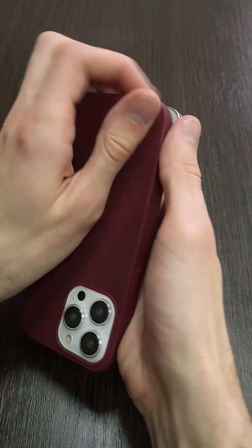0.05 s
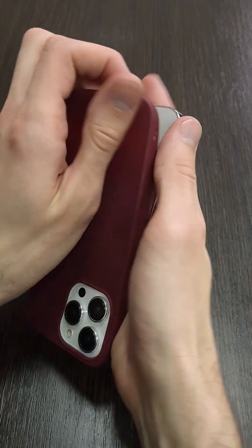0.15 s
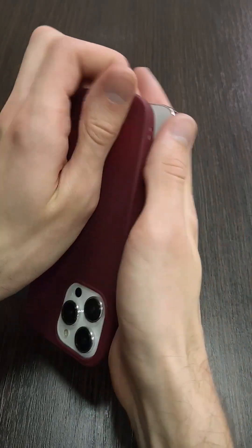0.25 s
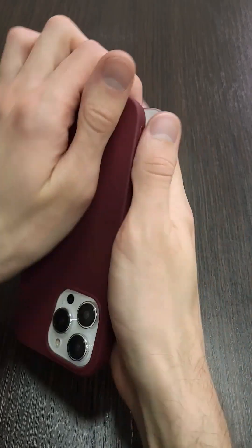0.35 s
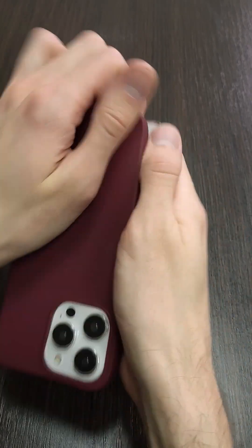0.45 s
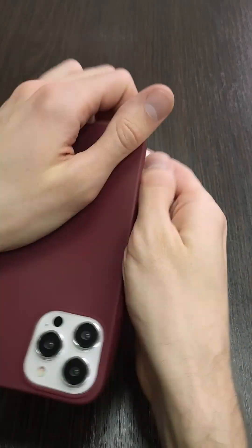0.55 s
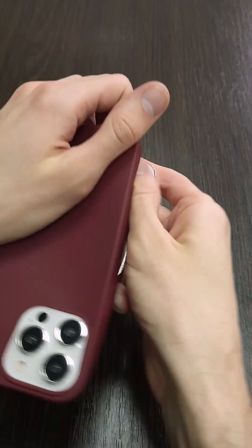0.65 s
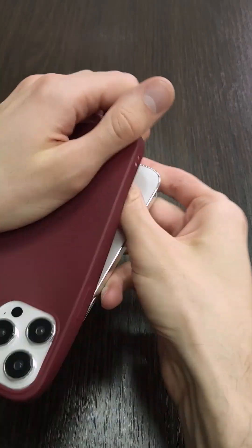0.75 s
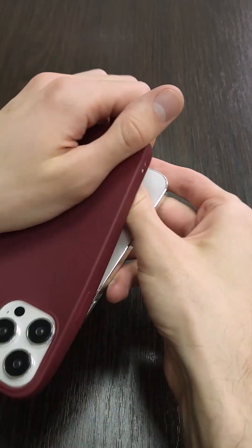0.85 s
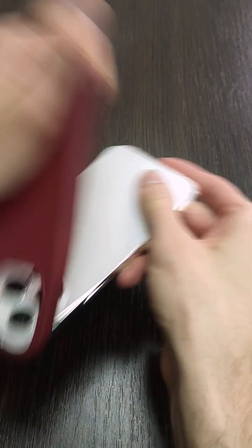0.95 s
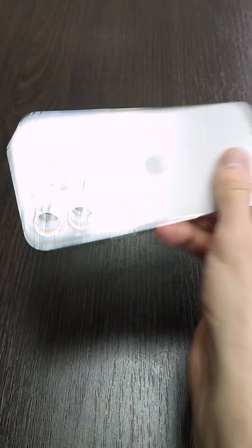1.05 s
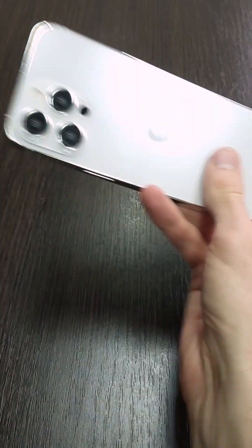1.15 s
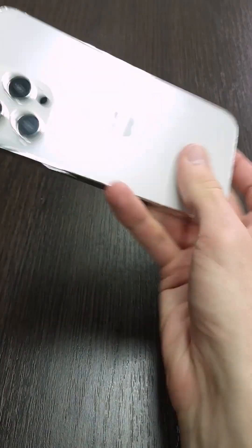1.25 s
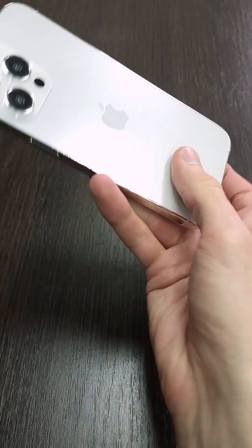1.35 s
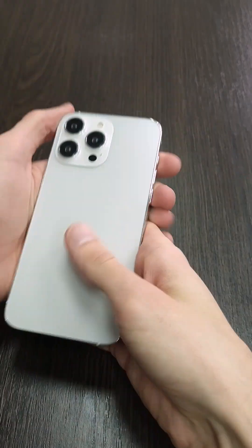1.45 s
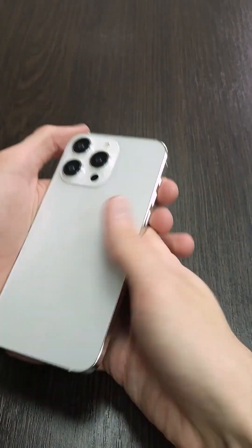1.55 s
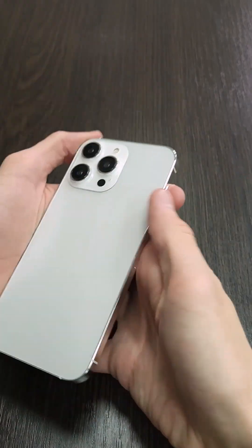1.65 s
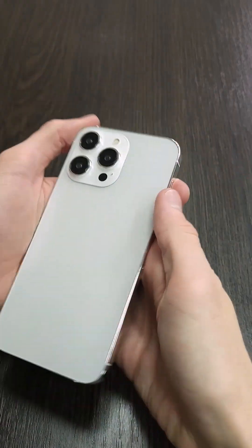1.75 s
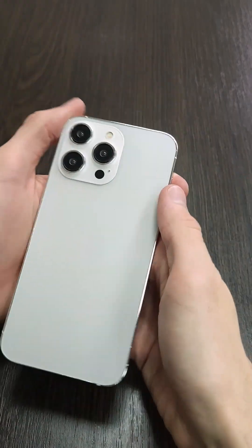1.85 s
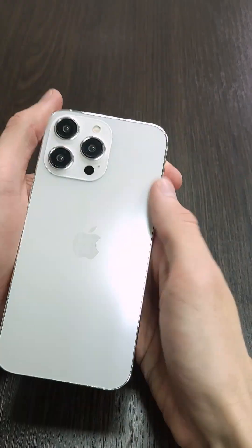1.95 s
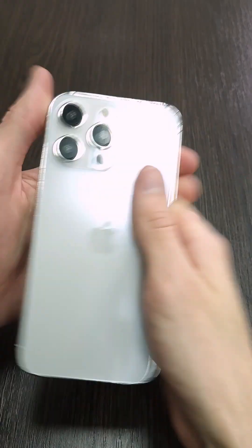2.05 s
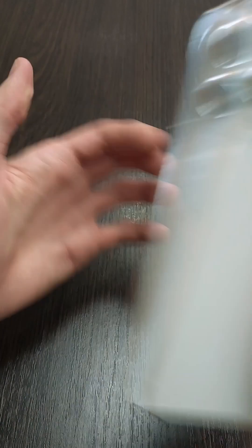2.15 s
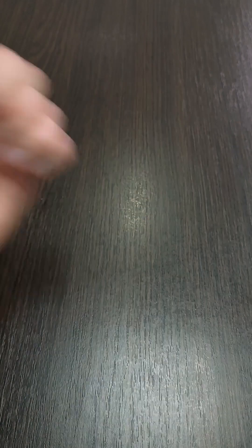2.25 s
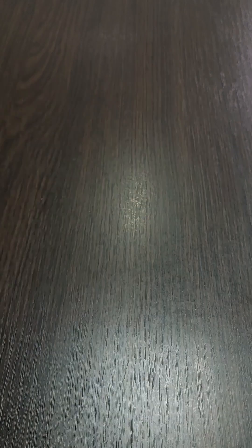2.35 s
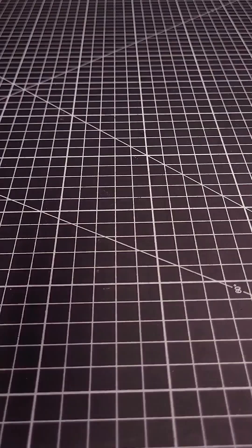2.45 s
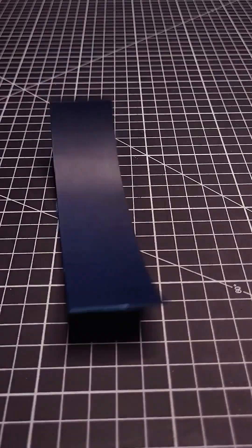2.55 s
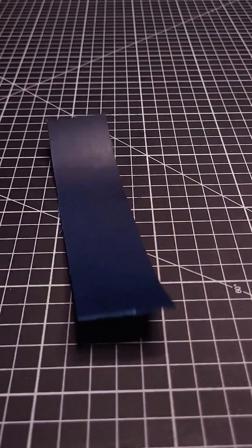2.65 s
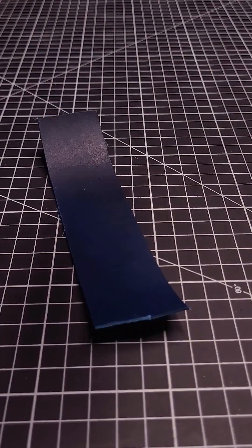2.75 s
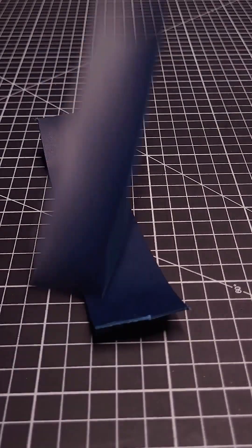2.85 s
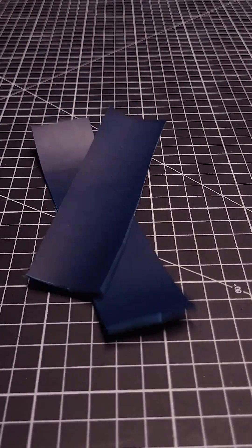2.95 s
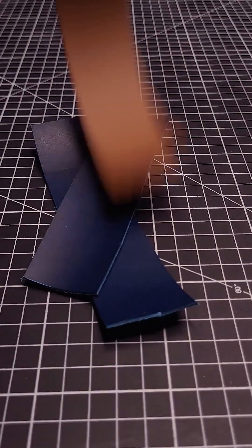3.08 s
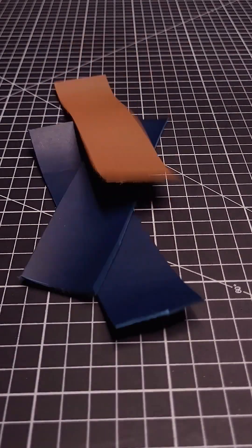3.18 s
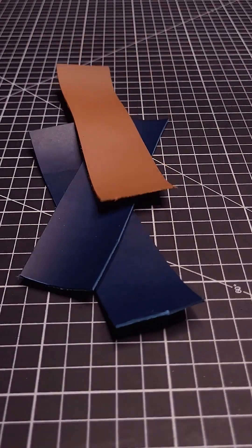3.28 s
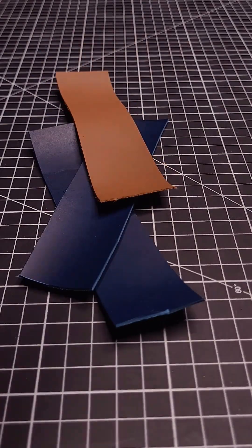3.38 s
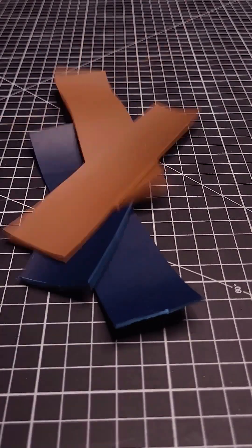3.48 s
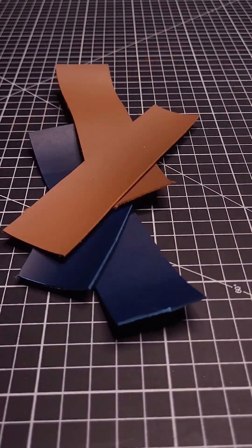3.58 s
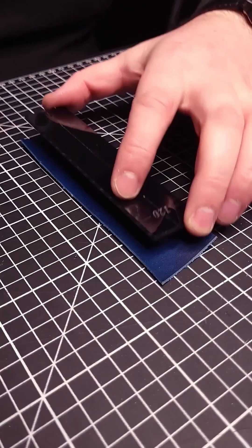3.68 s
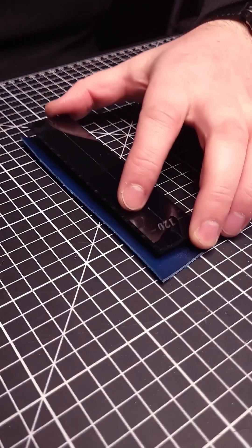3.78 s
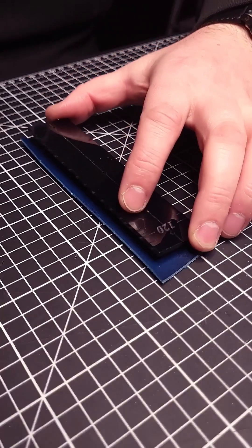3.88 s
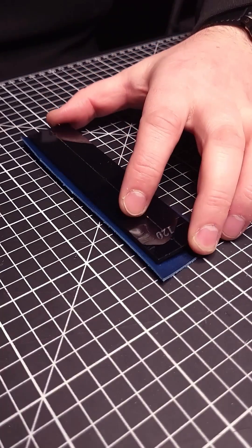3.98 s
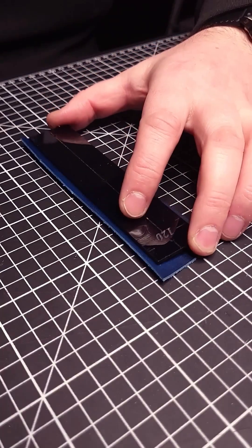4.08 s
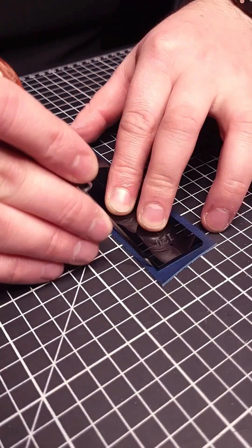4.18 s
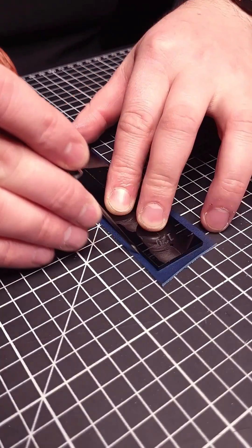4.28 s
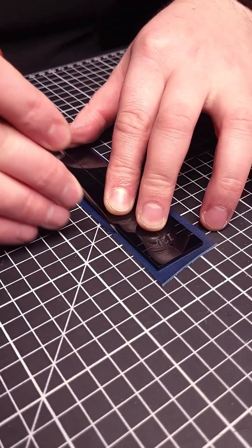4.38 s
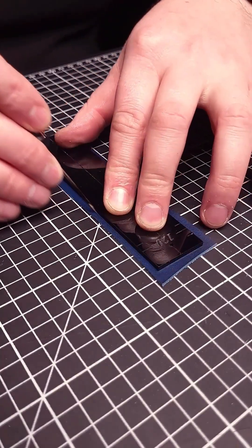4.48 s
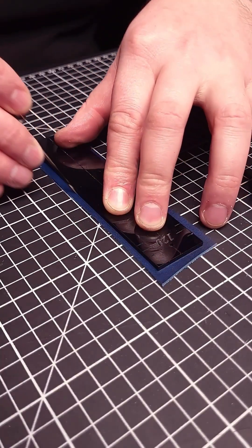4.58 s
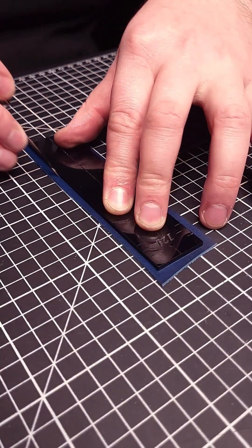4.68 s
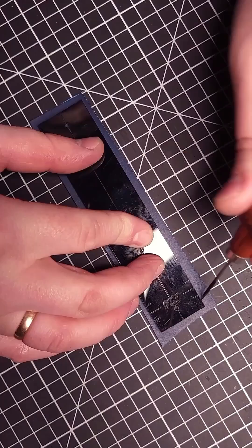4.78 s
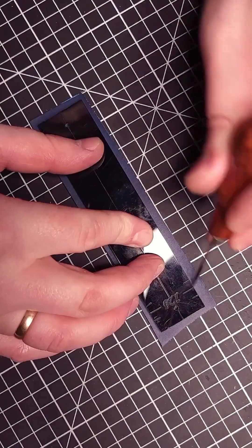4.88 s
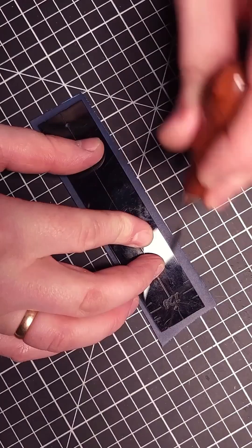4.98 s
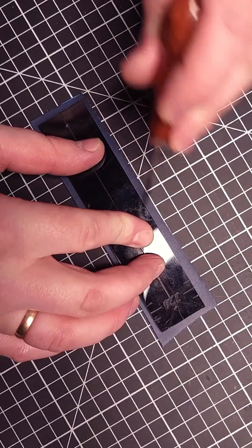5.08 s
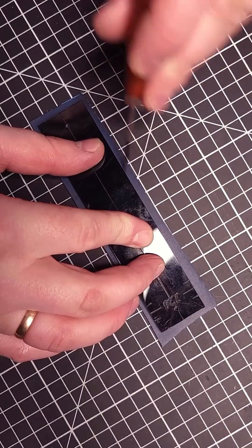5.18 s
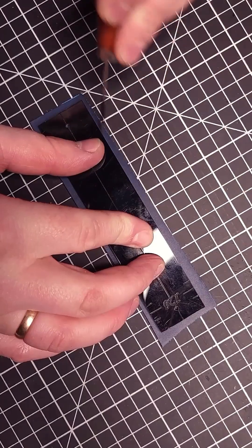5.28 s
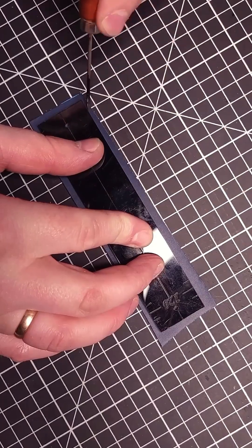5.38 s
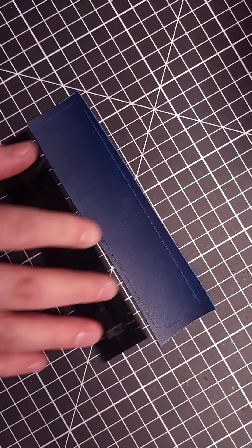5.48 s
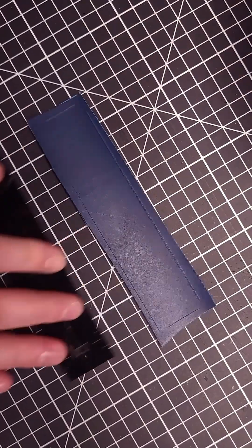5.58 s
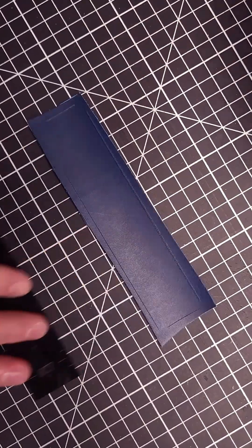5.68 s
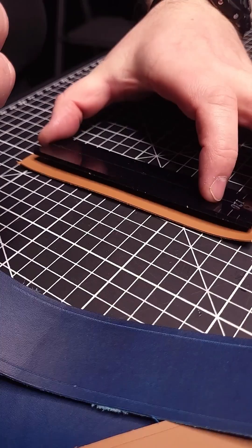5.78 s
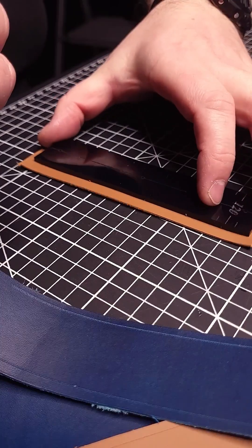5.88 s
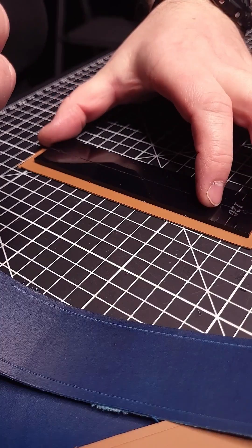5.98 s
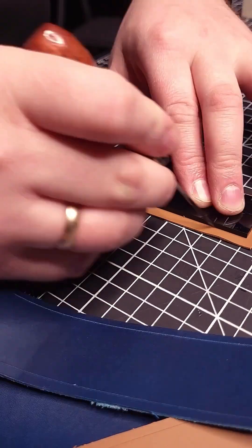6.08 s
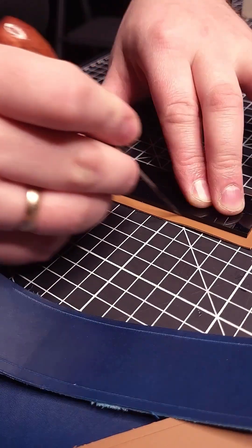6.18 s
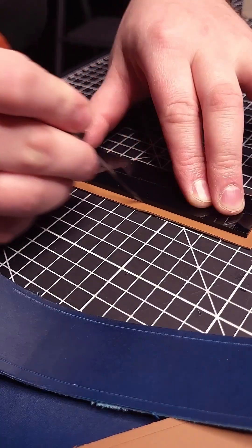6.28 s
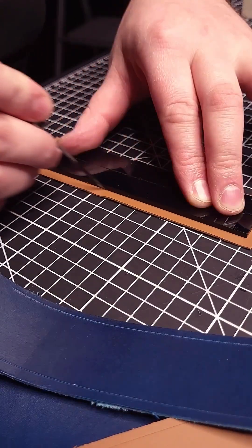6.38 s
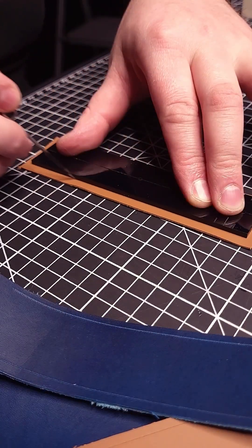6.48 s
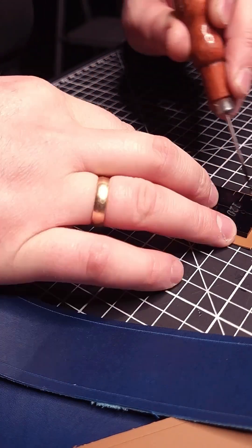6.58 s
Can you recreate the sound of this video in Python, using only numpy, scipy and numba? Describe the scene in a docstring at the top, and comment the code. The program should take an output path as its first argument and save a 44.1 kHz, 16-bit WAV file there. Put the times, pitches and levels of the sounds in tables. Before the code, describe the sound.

Close stereo handling at a desk: skin rubs a soft case, sharp snaps pop it off, and a phone lands dully in a palm over low rumble. An abrupt change to a quiet workshop with a faint motor hum: four leather strips slap onto a mat, an awl makes two gritty tearing strokes, a template slides off with knocks, and the awl scrapes again.

```python
"""At a desk, in wide stereo from two microphone ports, hands rub and snap a phone out of its soft case; it lands
in the palm and settles. From 2.4 s, heard from one point in a workshop, four leather strips slap onto a cutting
mat, a steel awl tears along the grain beside a template, the template slides off and the awl strokes again.
Rubs, friction and air are coloured noise, contacts are dying bursts, tears are uneven clicks, hard parts ring.
The level dips briefly at each join between shots."""
import sys
import numpy as np
from scipy import signal
from scipy.fft import rfft, irfft, next_fast_len
from scipy.io import wavfile
from numba import njit

SR = 44100
rng = np.random.default_rng(int(sys.argv[2]) if len(sys.argv) > 2 else 0)


def log_audio(samples):
    """Write samples as a 16-bit WAV file to the path given in sys.argv[1]."""
    # one column per channel
    frames = np.atleast_2d(samples).T
    # limit to full scale, then quantise
    limited = np.clip(frames, -1, 1)
    pcm = np.round(limited * 32767).astype(np.int16)
    wavfile.write(sys.argv[1], SR, pcm)


N = 292824
TIME = np.arange(N) / SR
SIZE = next_fast_len(N + SR)
HZ = np.maximum(np.arange(SIZE // 2 + 1) * SR / SIZE, 1)   # frequency grid

# Gesture columns, used by all movement tables below:
# [start t/s, end t/s, level/dB, rise t/s, fall t/s, change start to end/dB, arch/dB]

# awl strokes, with a dull rustle as the point lifts after the second; level before the gliding colour [gesture]
STROKES = [(4.144, 4.79, -30, 0.044, 0.0037, 0, 1.5), (4.793, 5.361, -32, .035, 0.054, 6.5, 5.5),
           (5.316, 5.395, -37.5, 0.0011, .003, -7, -2), (6.054, 6.541, -28.5, 0.016, 0.023, -4.5, 4.5),
           (6.542, 6.656, -35, 0.0061, .002, 3, 6)]
# colour of each stroke: lists of [f/Hz, level/dB]
STROKE_COLOURS = [
    [(59, -44), (100, -12.5), (166, -16.5), (210, 1), (328, 7), (481, 14), (535, 6), (1030, 6.5), (1420, 4),
     (2000, -0.5), (2370, 0.5), (4380, -6.5), (7140, -11.5), (9820, -6), (16000, -19.5)],
    [(59, -76), (100, -25), (215, -6.5), (452, 4.5), (502, 0), (836, 2), (1280, -1.5), (1550, 4),
     (1830, -1.5), (2080, -5.5), (3250, -5), (5080, -4), (7940, -10), (9210, -7), (16000, -22)],
    [(88, -26), (150, -8), (1700, -1), (2600, -24), (9270, -21), (15000, -34)],
    [(59, -25), (100, -19), (260, -4), (343, 0.5), (502, -7.5), (1030, 3.5), (1280, -4), (1580, -6),
     (1830, -6.5), (2130, -2.5), (3540, -6.5), (6990, -21.5), (10700, -8.5), (16000, -31)],
    [(59, -53), (100, -15.5), (801, 1), (1250, -9.5), (1870, -6), (2630, -7), (4670, -6), (7610, -28),
     (10000, -7.5), (16000, -23.5)],
]
# single fibre tears at set times, most of them strong [t/s, level re the rms of the chance tears/dB]
TEARS = [(4.181, 27.5), (4.1985, 26), (4.221, 18), (4.255, 30.5), (4.3138, 27.5), (4.473, 26.5),
         (4.5556, 28), (4.9635, 25.5), (5.0589, 12), (6.0694, 23.5), (6.176, 4), (6.2256, 27), (6.3413, 26),
         (6.5454, 37)]
WANDER_SHARE, WANDER_DB, WANDER_PER_S = .022, 2.0, 7   # the hand is never quite steady
SURGE_DB, SURGE_PER_S = -0.6, 14   # uneven pull


def awl():
    """The point tears fibre after fibre: uneven clicks, mostly pushes, on friction noise, in a gliding colour."""
    out = np.zeros(N)
    for row, spectrum in zip(STROKES, STROKE_COLOURS):
        out += gesture(*row) * rms_one(colour(grain(), spectrum))
    out = out * amp(SURGE_DB * drift(SURGE_PER_S))
    return hand_colour(out)


def grain():
    """Fibres give way at uneven times and strengths; steady friction hisses beneath."""
    strengths = amp(4.0 * np.minimum(rng.exponential(1, N), 4.0))
    signs = np.where(rng.random(N) < .72, 1, -1)
    tears_per_s = 2500 * amp(2.5 * drift(60))
    tears = rms_one(strengths * signs * (rng.random(N) < tears_per_s / SR))
    for s, db in TEARS:
        tears[round(s * SR)] += amp(db)
    friction = 0.51 * rng.standard_normal(N)
    return tears + friction


# the colour glides as the hand moves along the template; start, middle and end of each stroke, before the wander:
# [low ring f/Hz, level/dB, hollow f/Hz, level/dB, high ring f/Hz, level/dB, first echo off the fingers t/ms]
GLIDES = [
    [(2770, 0.5, 7100, -0.5, 10000, 11, 0.472), (4750, 8, 7600, -6.5, 10300, 13.5, 0.454),
     (3570, 13, 9000, 3.5, 11200, -3, 0.383)],
    [(4340, -1, 6200, -8, 9400, 10, 0.467), (4804, -0.5, 7400, -4.5, 9900, 5, 0.39),
     (4200, -1.5, 7460, -9, 14000, -5, 0.381)],
    [(4200, -6, 7300, -5, 11800, -8, 0.357)] * 3,
    [(2560, 1, 2900, -3, 9500, 1.5, 0.606), (3130, 6, 7300, -1.5, 11600, 0, 0.517),
     (2740, 2.5, 8100, -10, 12400, -6, 0.513)],
    [(4660, 3.5, 9000, 1.5, 9900, 5, 0.606), (4600, 3.5, 7300, -1, 10500, 1.5, .52),
     (4500, -4, 6840, 5, 10500, -2, .45)],
]


def glides():
    """The moving hand's resonances and echo, joined by straight lines in time."""
    times = np.sort([np.linspace(start, end, 3) for start, end, *_ in STROKES], axis=None)
    return in_time(np.column_stack([times, np.vstack(GLIDES)]))


def hand_colour(x):
    """Three short echoes off the fingers, then a low ring, a hollow and a high ring, all gliding."""
    low_hz, low_db, hollow_hz, hollow_db, high_hz, high_db, echo_ms = glides()
    low_db, hollow_db, high_db = (db + WANDER_DB * drift(WANDER_PER_S) for db in (low_db, hollow_db, high_db))
    echo_ms = echo_ms * (1 + WANDER_SHARE * drift(WANDER_PER_S))
    for longer, share in ((1, .3), (2.3, .26), (3.4, .24)):   # each echo also repeats those before it
        echo = np.interp(TIME - longer * echo_ms / 1000, TIME, x)
        x = x + share * echo
    x = gliding_bell(x, low_hz, amp(low_db), 3.7, SR)
    x = gliding_bell(x, hollow_hz, amp(hollow_db), 1.6, SR)
    return gliding_bell(x, high_hz, amp(high_db), 4.4, SR)


@njit
def gliding_bell(x, hz, gain, sharpness, rate):
    """A peak (gain over 1) or a hollow whose centre and gain change sample by sample."""
    y = np.zeros_like(x)
    for i in range(2, len(x)):
        w, root = 2 * np.pi * hz[i] / rate, np.sqrt(gain[i])
        a, c = np.sin(w) / (2 * sharpness), -2 * np.cos(w)
        fed = (1 + a * root) * x[i] + c * x[i - 1] + (1 - a * root) * x[i - 2]
        y[i] = (fed - c * y[i - 1] - (1 - a / root) * y[i - 2]) / (1 + a / root)
    return y


# parts of a strip meet the mat one after another [t/s, level before the band offsets/dB, crack re level/dB]
SLAPS = [(2.4805, -19, 7), (2.4857, 0, 10.5), (2.4919, 1, -2), (2.4953, -3, 9), (2.5103, -7.5, 3),
         (2.8242, -31.5, 2), (2.8293, -7, 5), (2.843, -12.5, 18), (2.8506, -7.5, -23.5),
         (2.8565, -18, -3.5), (3.081, -24, 18.5), (3.084, -7, -10.5), (3.0866, -10, 14),
         (3.0886, -1.5, 9.5), (3.093, -24, 4.5), (3.1429, -24, -11.5), (3.1468, -20.5, 4),
         (3.4262, -13.5, 1), (3.4293, -5, -2.5), (3.4303, -16.5, -5.5), (3.4325, -9.5, -5),
         (3.436, -13, -7.5), (3.438, -16.5, -3), (3.4413, -21, -3), (3.442, -15.5, -5.5)]
# thud of each strip, for a crack of 0 dB [thud re level/dB]
THUD_DB = [-13.5, -8.5, -9, -6]
THUD_PER_CRACK = -.3   # dB per dB: the duller the contact, the more it thuds
REBOUND_DB, REBOUND_MS = -12, 5.5   # scaled by chance: 0.5 to 1.5 times the dB, within the ms


def strips():
    """Each part of a strip that meets the mat rebounds and meets it again, weaker; rows for the blows."""
    s, db, crack_db = np.transpose(SLAPS)
    strip = np.cumsum(np.diff(s, prepend=s[0]) > .1)   # a long pause starts the next strip
    thud_db = np.take(THUD_DB, strip) + THUD_PER_CRACK * crack_db
    rows = np.transpose([s, db, thud_db, crack_db])
    later, spread = rng.random((len(rows), 2)).T
    delay = np.outer(later, [REBOUND_MS / 1000, 0, 0, 0])
    loss = np.outer(.5 + spread, [0, REBOUND_DB, 0, 0])
    return [*rows, *(rows + delay + loss)]


# small ticks and knocks of fingers, awl and template
# [t/s, level before the band offsets/dB, thud re level/dB, crack re level/dB]
TICKS = [(3.574, -48, 17, -15), (3.604, -52, 12, -15), (3.9997, -43.5, -11, 9.5), (4.8007, -21, -9, 5),
         (5.424, -19, -8.5, -7), (5.476, -16.5, -7, -1), (5.826, -51, 6, 8), (5.887, -55, 7, 2),
         (5.925, -52, 2, 0)]


def slaps_and_ticks():
    """Leather, fingers and tools strike as short three-band blows."""
    return blows(strips() + TICKS, burst_ms=1.0, thud_ms=4.8, near_db=5.0, dull_db=9.0)


# the two heavier strips thump the table top [t/s, level/dB]
THUMPS = [(3.086, -25), (3.428, -17)]
# low modes of the table top [f/Hz, level/dB, t60/s]
TABLE = [(151, -3, .04), (228, -2, .04)]


def thumps():
    """One click per heavy strip sets the low modes of the table top ringing."""
    clicks = np.zeros(N)
    for s, db in THUMPS:
        clicks[round(s * SR)] = amp(db)
    return modes(clicks, TABLE)


# template nudged, then slid off the leather [gesture]
SLIDE = [(5.397, 5.423, -44, .002, 0.0016, -1, 0.16), (5.421, 5.734, -28.5, 0.0092, 0.0063, 0.69, 0.72)]
# colour of the slide [f/Hz, level/dB]
SLIDE_COLOUR = [(59, -46), (100, -50), (181, -22.5), (244, -11), (492, -8), (608, -1.5), (1030, 1),
                (1250, -2.5), (1870, 5.5), (3190, 4.5), (5190, -10.5), (11200, -10.5), (16000, -27)]


def slide():
    """The flat template rubs smoothly over the leather: noise with a quick flutter in level."""
    rub = rms_one(colour(rng.standard_normal(N), SLIDE_COLOUR))
    return sum(gesture(*row) for row in SLIDE) * amp(1.33 * drift(96)) * rub


# mat and template hum along with whatever scrapes them [f/Hz, ring level re a unit click/dB, t60/s]
MAT = [(410, -50, .05), (555, -48, .06), (835, -48, .05), (1030, -49, .05), (1350, -50, .05),
       (1560, -50, .05), (1700, -49, .05), (1920, -47, .05), (2115, -49, .04)]


def scrapes():
    """Awl and template drive the weak modes of mat and template."""
    scrape = awl() + slide()
    return scrape + modes(scrape, MAT)


# case snaps and finger ticks
# [t/s, level before the band offsets/dB, thud re level/dB, crack re level/dB, left-right/dB]
SNAPS = [(0.0238, -16, -17, -1, -4), (0.1805, -18, -12, -26, 9), (0.3308, -42, -4, -6, -4),
         (0.4262, -43, -6, -8, 2), (0.5305, -41, -5, -4, -2), (0.8183, -10, -15, -1, -5),
         (1.1207, -32, -9, -5, 3), (1.2163, -37, -10, 0, -3), (1.3526, -37, -11, 2, 2),
         (1.3998, -6, -14, -5, -9), (2.1368, -40, -6, 1, -2)]


def snaps():
    """Case and fingers strike as short blows, stronger at one port or the other."""
    rows = np.array(SNAPS)
    ports = []
    for side in (.5, -.5):
        port_rows = rows + np.outer(rows[:, 4], [0, side, 0, 0, 0])
        ports.append(blows(port_rows, burst_ms=1.0, thud_ms=4.8, near_db=2.0, dull_db=37.0))
    ports[0] = np.roll(ports[0], 6)   # the left port is a little farther away
    return np.array(ports)


# the one snap that scuffs the hollow case into ringing [t/s, level of the scuff/dB, dying time/s]
KNOCK = (.1808, -62.5, 0.043)
# modes of the case [f/Hz, level/dB, t60/s]
CASE = [(700, -9, .09), (1050, -9, .06), (1250, -3, .08), (1410, -1, .08), (1620, -5, .05)]


def case_ring():
    """A dying noise scuff sets the modes of the hollow case ringing."""
    start, db, dying_s = KNOCK
    scuff = amp(db) * (TIME > start) * np.exp(-np.abs(TIME - start) / dying_s) * rng.standard_normal(N)
    return sum(amp(mode_db) * ring(scuff, hz, t60) for hz, mode_db, t60 in CASE)


# phone lands in the palm, a short dull scuffle [gesture]
PALM = (1.3985, 1.4255, -19, .002, .003, -3, 2)
# colour of the scuffle [f/Hz, level/dB]
PALM_COLOUR = [(29, -27), (50, 5), (222, 2), (784, -6), (1300, -11.5), (2050, -13), (2300, -19),
               (2520, -17.5), (12000, -48), (15600, -72), (22000, -120)]
# the phone settles in the hand with a soft hollow thump [gesture]
SETTLE = (1.478, 1.59, -39, .012, .03, -14, 0)


def palm():
    """A burst of dull wide noise as the phone lands, then noise through one hollow resonance."""
    scuffle = gesture(*PALM) * wide_noise(PALM_COLOUR)
    hollow = rms_one(ring(rng.standard_normal(N), hz=422, t60=0.029))
    return scuffle + gesture(*SETTLE) * hollow


# skin rubs over case and glass [gesture]
RUBS = [(0.001, 0.15, -38.5, 0.023, 0.036, -18, -2), (0.132, 0.69, -55, 0.027, 0.079, -5.5, 1.5),
        (0.603, 0.826, -67.5, 0.062, .01, 4, -3), (0.768, 1.216, -40, 0.069, 0.074, -3, -7),
        (1.192, 1.432, -61, .02, 0.065, 20.5, -2.5), (1.45, 1.724, -62.5, 0.0088, 0.3, -31, 19),
        (1.93, 2.437, -55.5, 0.03, 0.011, 7, 1.5)]
# colour of the skin [f/Hz, level/dB]
SKIN = [(530, 2), (900, 7.5), (1040, -10), (1200, 2.5), (2480, -1.5), (5980, -2), (7770, -2), (11500, -10),
        (14400, -4), (15500, -2.5)]
STILL_SKIN_DB = -69.5   # fingers at rest


def skin():
    """Rubbing skin hisses with a quick flutter in level."""
    level = amp(STILL_SKIN_DB) + sum(gesture(*row) for row in RUBS)
    return level * amp(1.56 * drift(41)) * wide_noise(SKIN)


# colour of the handling noise [f/Hz, level/dB]
HANDLING = [(71, -13), (120, -2.5), (135, -1), (248, 0), (485, -11.5), (797, -9.5), (1000, -11.5),
            (1140, -21), (2500, -21.5), (3250, -41), (5500, -120)]
HANDLING_DB, HANDLING_SAG_DB_PER_S = -52.5, -1.5


def handling():
    """Dull handling noise sways in level and sinks slowly."""
    db = HANDLING_DB + HANDLING_SAG_DB_PER_S * TIME
    return amp(db + 3.9 * drift(6.1)) * wide_noise(HANDLING)


# colour of the rumble [f/Hz, level/dB]
RUMBLE = [(12, -79), (20, -62), (31, -45), (43, 15), (75, 9.5), (104, 5), (139, -9), (160, -6.5),
          (210, -43), (350, -120)]
RUMBLE_DB, RUMBLE_SAG_DB_PER_S = -43.5, -2.0
# the rumble dips briefly [t/s, depth/dB]
LULLS = [(.13, -20), (.3, -11), (.69, -11), (.79, -6), (.99, -3), (1.2, -8), (1.46, -3), (1.54, -13),
         (1.78, -13), (1.9, -7), (2.08, -2)]
LULL_HALF_S = 0.043
JOLT_DB, JOLT_S = -24, 0.016   # each snap shakes the desk: level re the snap's, dying time


def rumble():
    """Low shaking of the desk: it sinks slowly, dips now and then and jumps with every snap."""
    db = RUMBLE_DB + RUMBLE_SAG_DB_PER_S * TIME
    db += sum(depth * np.maximum(1 - np.abs(TIME - s) / LULL_HALF_S, 0) for s, depth in LULLS)
    jolts = np.zeros(N)
    for s, peak, *_ in SNAPS:
        jolts += amp(peak + JOLT_DB) * (TIME > s) * np.exp(-np.abs(TIME - s) / JOLT_S)
    return (amp(db) + jolts) * wide_noise(RUMBLE)


# faint pitched ticks of small hard things [t/s, f/Hz, level/dB, t60/s]
PINGS = [(3.361, 6960, -39.5, 0.013), (3.411, 7050, -52, 0.0088), (5.887, 13700, -48, 0.011),
         (5.887, 5500, -54, .012)]


def pings():
    """One click into one short ring each."""
    out = np.zeros(N)
    for s, hz, db, t60 in PINGS:
        click = 1. * (np.arange(N) == round(s * SR))
        out += amp(db) * ring(click, hz, t60)
    return out


# faint narrow bands of noise: rustles, and a swell of the hum near 700 Hz [f/Hz, width f/Hz, then gesture]
NARROW_BANDS = [(4700, 1200, 2.7, 2.76, -60.5, 0.022, 0.042, 0.0055, 2),
                (2500, 180, 5.79, 6.05, -67.5, 0.09, 0.011, 0, 0),
                (700, 200, 5.74, 6.6, -53, 0.014, 0.0059, 0, 0.42),
                (620, 250, 3.33, 3.42, -54.5, 0.015, 0.018, 0, 0.54)]


def narrow_bands():
    """Rustles and the swell of the hum: noise through one resonance each."""
    return sum(gesture(*row) * resonant_noise(hz, width) for hz, width, *row in NARROW_BANDS)


# a distant motor [f/Hz, width f/Hz, level/dB]
HUM = [(130, 12, -62), (780, 14, -68), (680, 200, -64)]


def hum():
    """The distant motor: steady noise through a few resonances."""
    return sum(amp(db) * resonant_noise(hz, width) for hz, width, db in HUM)


# colour of the workshop air [f/Hz, level/dB]
AIR = [(12, 11), (20, 4), (55, -0.5), (134, -28), (193, -7.5), (270, -6), (293, -17), (388, -5.5),
       (660, -14), (897, -31.5), (1030, -19.5), (1860, -21.5), (2460, -22.5), (3740, -25.5), (4940, -24.5),
       (16000, -30.5)]
# level of the air [t/s, level/dB]
AIR_LEVEL = [(2.44, -55), (3.67, -54), (4.1, -56), (5.74, -54.5), (6.05, -54)]


def air():
    """Still workshop air: coloured noise at a slowly changing level."""
    return amp(in_time(AIR_LEVEL)[0]) * rms_one(colour(rng.standard_normal(N), AIR))


THUD_HZ, BODY_HZ, CRACK_HZ = (90, 700), (600, 6500), (5500, 11000)   # body top before softening


def blows(rows, burst_ms, thud_ms, near_db, dull_db):
    """A click with a dying noise burst, split in a thud, a body and a crack, each at its own peak level."""
    out, t = np.zeros(N), np.arange(1500) / SR
    for (s, db, thud_db, crack_db, *_), noise in zip(rows, rng.standard_normal((len(rows), 1500))):
        at = round(s * SR)
        body_hz = BODY_HZ[0], BODY_HZ[1] * np.clip(amp(crack_db + 2), .3, 1)   # a soft contact is dull
        parts = [(THUD_HZ, thud_db, thud_ms), (body_hz, near_db, burst_ms), (CRACK_HZ, crack_db - dull_db, burst_ms)]
        for hz, level_db, ms in parts:
            band = signal.butter(2, hz, "band", fs=SR, output="sos")
            burst = (noise + 2.5 * (t == 0)) * np.exp(-1000 * t / ms)
            part = signal.sosfilt(band, burst)
            out[at:at + 1500] += amp(db + level_db) * part / np.abs(part).max()
    return out


RAMP_DB = 25   # how far below its level a gesture starts and ends


def gesture(start, end, db, rise_s, fall_s, change_db, arch_db):
    """Gain of one movement: a quick rise, a sloping and arched hold, a fall."""
    along = np.clip((TIME - start) / (end - start), 0, 1)
    rise = np.clip(1 - (TIME - start) / abs(rise_s), 0, 1)
    fall = np.clip(1 - (end - TIME) / abs(fall_s), 0, 1)
    hold_db = db + change_db * along + arch_db * 4 * along * (1 - along)
    return amp(hold_db - RAMP_DB * (rise + fall)) * (TIME > start) * (TIME < end)


def ring(x, hz, t60):
    """A unit click sets a sine of height 1 ringing."""
    r, w = amp(-60 / (t60 * SR)), 2 * np.pi * hz / SR
    return signal.lfilter([0, np.sin(w)], [1, -2 * r * np.cos(w), r * r], x + 1e-18)


def modes(x, table):
    """A struck or scraped body rings in several modes of alternating sign."""
    return sum((-1) ** k * amp(db) * ring(x, hz, t60) for k, (hz, db, t60) in enumerate(table))


def resonant_noise(hz, width):
    """Noise through one resonance, rms 1; a wider resonance dies sooner."""
    return rms_one(ring(rng.standard_normal(N), hz, 2.2 / width))


# likeness of the two ports at the desk, limited to 0..1 in use [f/Hz, left-right likeness]
DESK_LIKENESS = [(60, 0.9), (180, 0.99), (550, 0.4), (1650, -0.91), (4970, 0.22), (15000, -1.57)]


def wide_noise(spectrum):
    """Noise at two microphone ports, as alike in each frequency range as the table says; rms 1."""
    alike = np.clip(at_hz(DESK_LIKENESS), 0, 1)
    mid, side = rfft(colour(rng.standard_normal((2, N)), spectrum), SIZE)
    ports = np.sqrt(1 + alike) * mid + np.sqrt(1 - alike) * side * [[1], [-1]]
    return rms_one(irfft(ports, SIZE)[:, :N])


def colour(x, spectrum):
    """Causal (minimum-phase) filter with the given dB per frequency."""
    fold = irfft(np.log(amp(at_hz(spectrum))), SIZE)
    fold[1:SIZE // 2] *= 2
    fold[SIZE // 2 + 1:] = 0
    return irfft(rfft(x, SIZE) * np.exp(rfft(fold)), SIZE)[..., :N]


def drift(rate):
    """Slow chance, spread 1: noise through a double low-pass at the rate in Hz."""
    r = np.exp(-2 * np.pi * rate / SR)
    return rms_one(signal.lfilter([1], [1, -2 * r, r * r], rng.standard_normal(N + SR))[SR:])


def amp(db):
    """dB to gain."""
    return 10 ** (np.asarray(db) / 20)


def rms_one(x):
    """Scale to rms 1."""
    return x / np.sqrt(np.mean(x ** 2) + 1e-20)


def in_time(rows):
    """Columns along time."""
    s, *columns = np.transpose(rows)
    return [np.interp(TIME, s, c) for c in columns]


def at_hz(points):
    """Read (Hz, value) points on the frequency grid, straight over log frequency."""
    hz, values = np.array(points).T
    return np.interp(np.log(HZ), np.log(hz), values)


# joins between shots [t/s, half length of the dip t/s, depth/dB]
JOINS = [(1.897, 0.02, -9.5), (2.433, 0.0067, -22), (2.687, 0.0065, -18), (2.98, 0.0037, -30),
         (3.32, 0.0052, -18), (3.664, .008, -15)]
# decay of the reverberation, before each place's factor [f/Hz, t60/s]
ROOM_T60 = [(100, 0.42), (260, 0.42), (700, 0.76), (1840, 0.39), (4850, 0.34), (12800, 0.55)]


def room(x, wet_db, shorter):
    """Each half octave feeds a diffuse tail that dies at its own rate; a join ends the tail of the shot before."""
    points, out = np.array(ROOM_T60), x.copy()
    edges = [0] + [round(s * SR) for s, *_ in JOINS] + [N]
    white = rng.standard_normal((2, *x.shape))
    for k, hz in enumerate(88 * 2 ** np.arange(0, 7.4, .5)):
        band = signal.butter(2, [hz, 2 ** .5 * hz], "band", fs=SR, output="sos")
        t60 = shorter * np.interp(np.log(hz), np.log(points[:, 0]), points[:, 1])
        keep = amp(-120 / SR / t60)   # power kept per sample
        power = signal.sosfilt(band, x + 1e-12) ** 2
        shots = [signal.lfilter([1 - keep], [1, -keep], power[:, a:b]) for a, b in zip(edges, edges[1:])]
        out += amp(wet_db) * np.sqrt(np.hstack(shots)) * rms_one(signal.sosfilt(band, white[k % 2]))
    return out


DESK_END_S = 2.432


def desk():
    """The phone at the desk; only snaps and case feed the short room tail."""
    struck = room(snaps() + case_ring(), wet_db=-13.0, shorter=0.25)
    return (skin() + handling() + rumble() + palm() + struck) * (TIME < DESK_END_S)


# how much the workshop's two channels differ [f/Hz, side re mid/dB]
WORKSHOP_SIDE = [(60, -17), (180, -20.5), (550, -46), (1650, -24), (4970, -46), (15000, -30)]


def workshop():
    """Strips, awl and template in still air with a faint hum; nearly the same in both channels."""
    struck = room(slaps_and_ticks()[None], wet_db=-13.5, shorter=0.8)[0]
    mid = struck + scrapes() + thumps() + pings() + narrow_bands() + hum() + air()
    side = colour(np.roll(mid, 40), WORKSHOP_SIDE)   # a faint copy, 40 samples late
    return np.array([mid + side, mid - side]) * (TIME >= DESK_END_S)


def scene():
    """Both places, dipped at each join."""
    dip_db = sum(db * np.maximum(1 - np.abs(TIME - s) / half, 0) for s, half, db in JOINS)
    return (desk() + workshop()) * amp(dip_db)


CUTOFF_HZ = 15800


def record(dry):
    """Peaks are rounded, the top is cut."""
    rounded = .85 * np.tanh(dry / .85)
    return signal.sosfilt(signal.ellip(12, .5, 70, CUTOFF_HZ, fs=SR, output="sos"), rounded)


dry = scene()
out = record(dry)
log_audio(out)
```